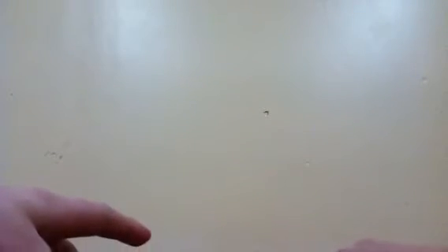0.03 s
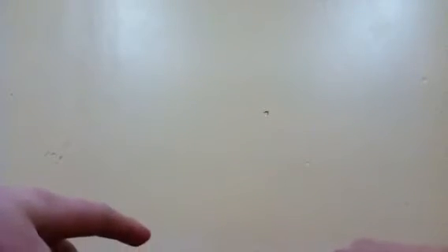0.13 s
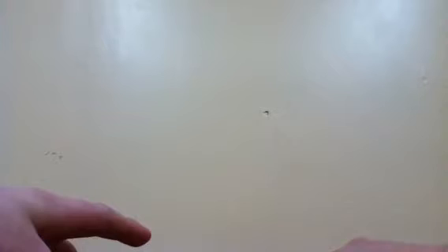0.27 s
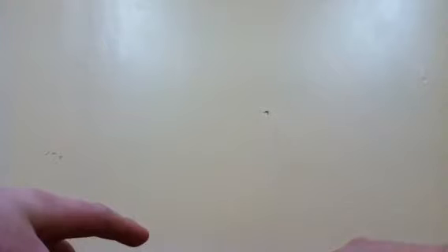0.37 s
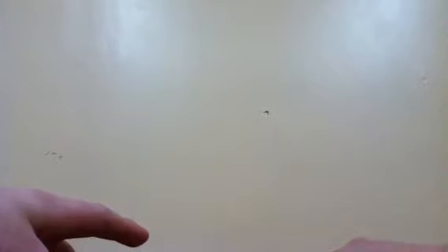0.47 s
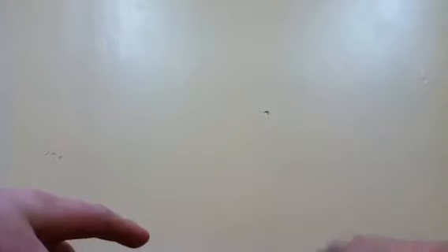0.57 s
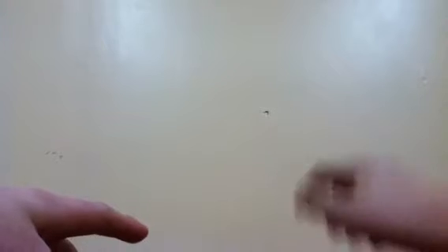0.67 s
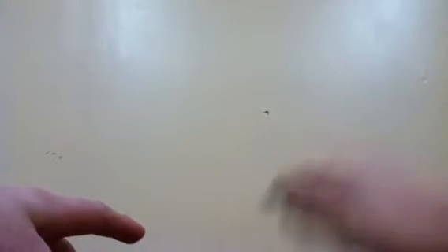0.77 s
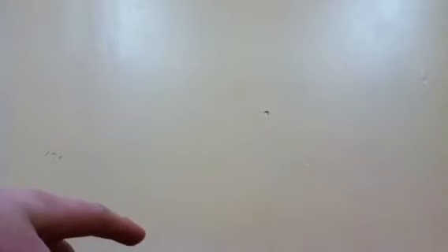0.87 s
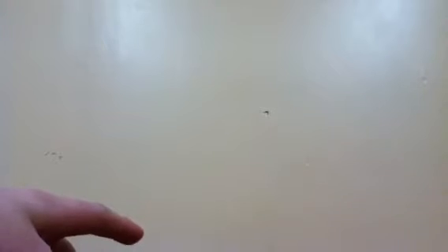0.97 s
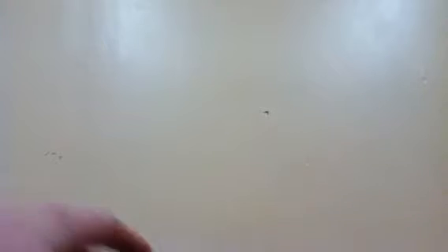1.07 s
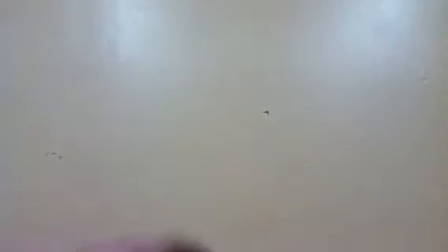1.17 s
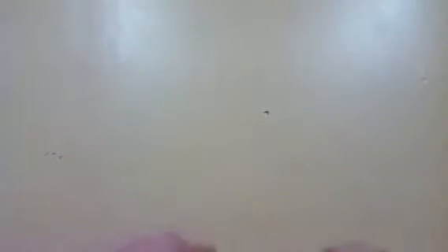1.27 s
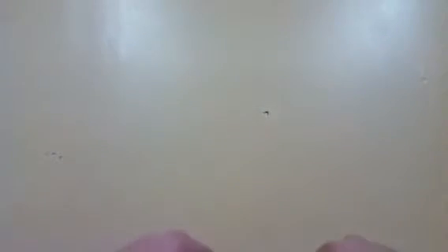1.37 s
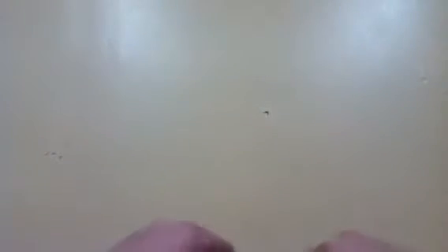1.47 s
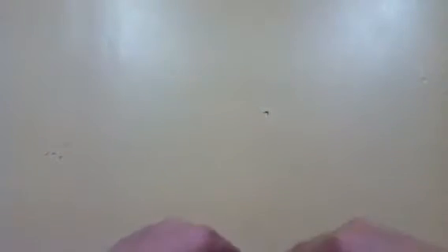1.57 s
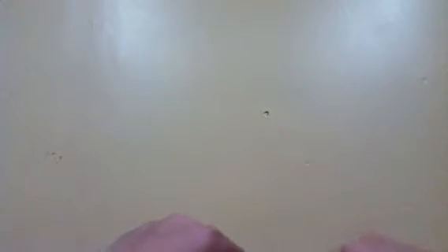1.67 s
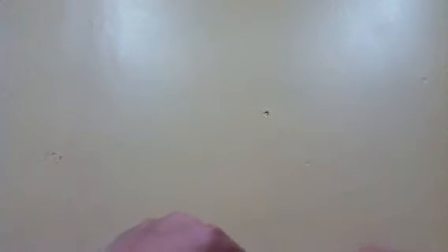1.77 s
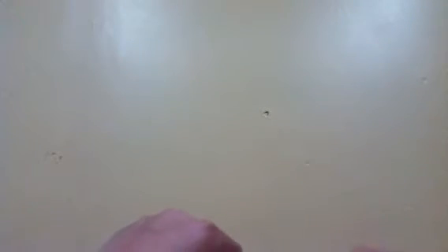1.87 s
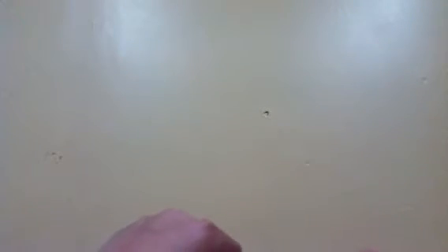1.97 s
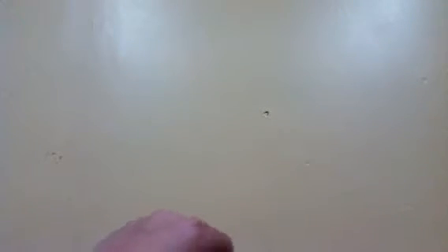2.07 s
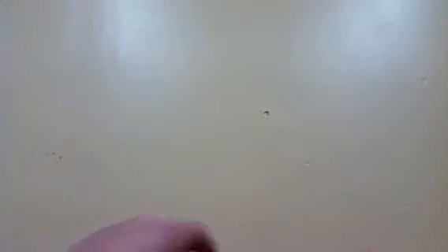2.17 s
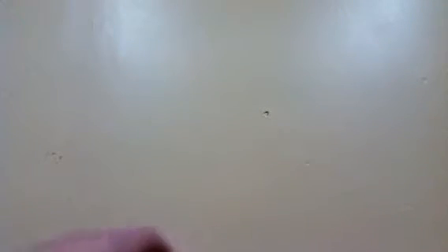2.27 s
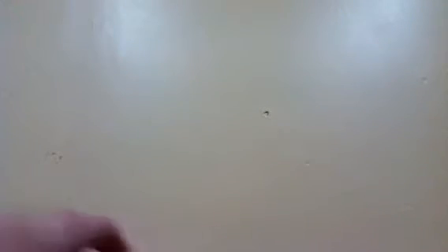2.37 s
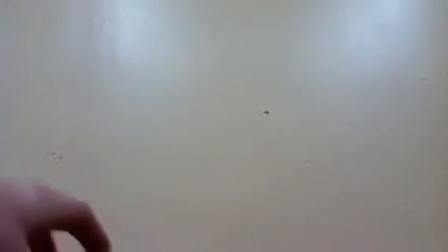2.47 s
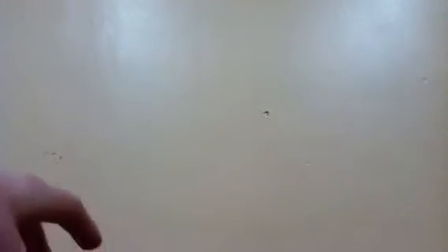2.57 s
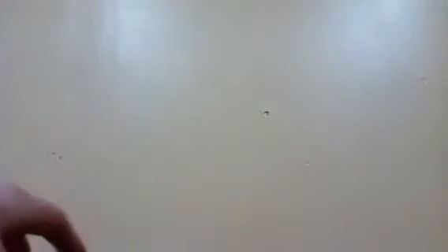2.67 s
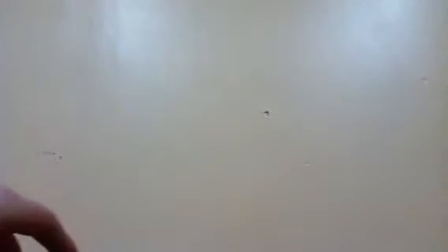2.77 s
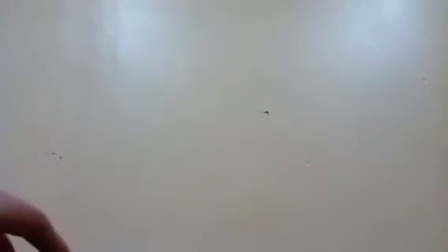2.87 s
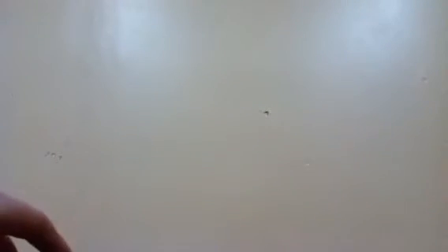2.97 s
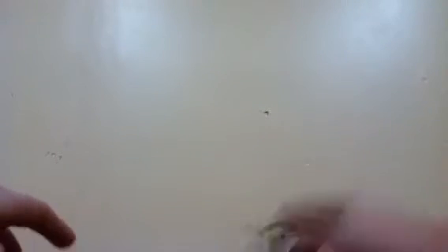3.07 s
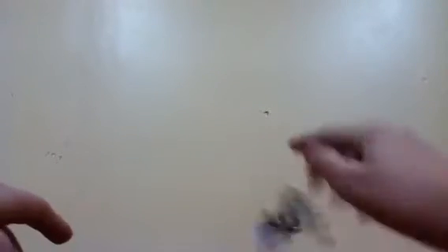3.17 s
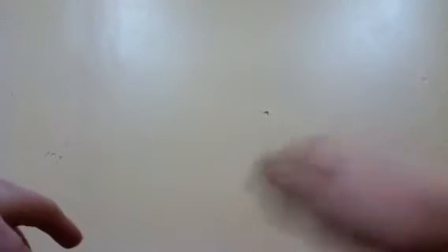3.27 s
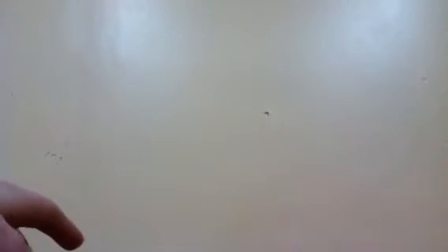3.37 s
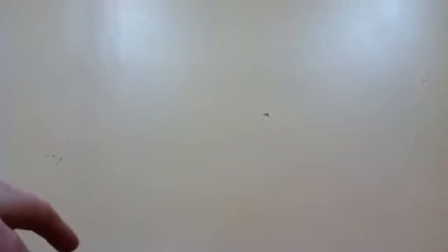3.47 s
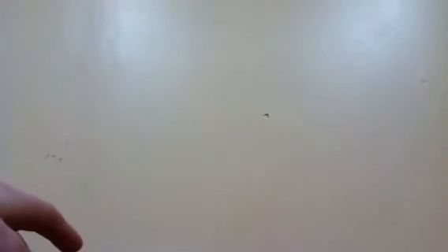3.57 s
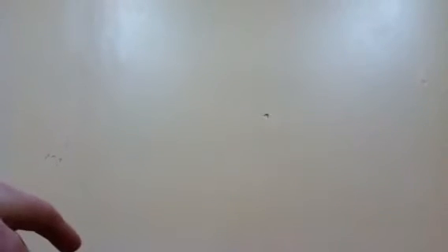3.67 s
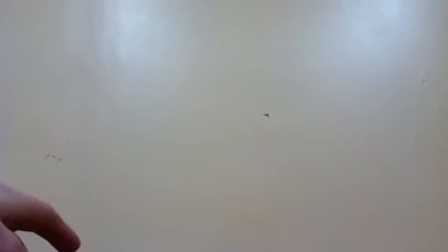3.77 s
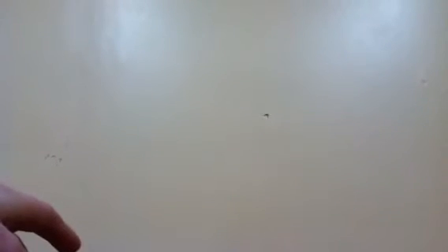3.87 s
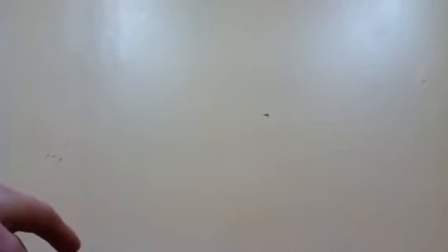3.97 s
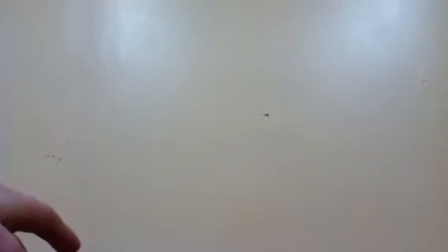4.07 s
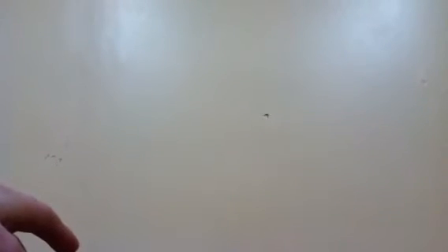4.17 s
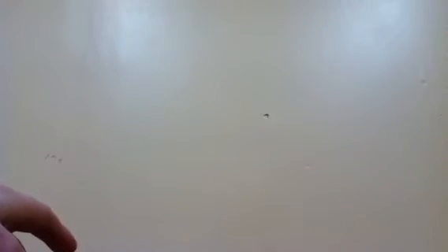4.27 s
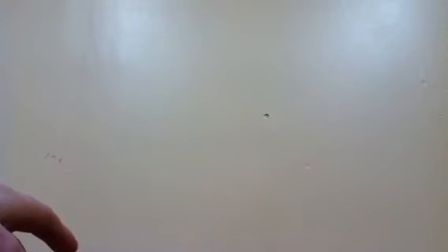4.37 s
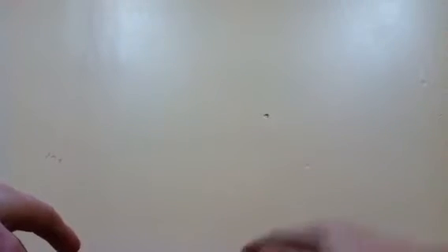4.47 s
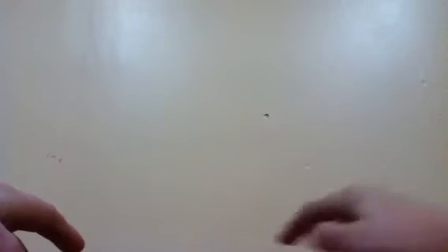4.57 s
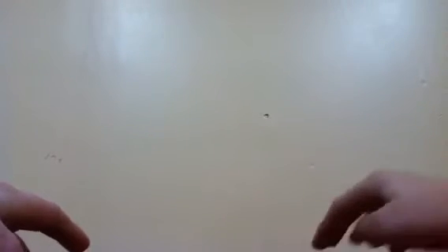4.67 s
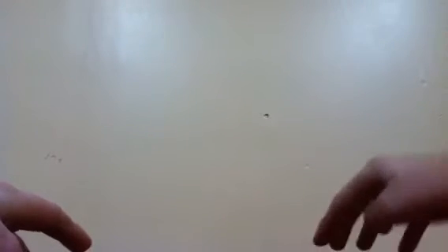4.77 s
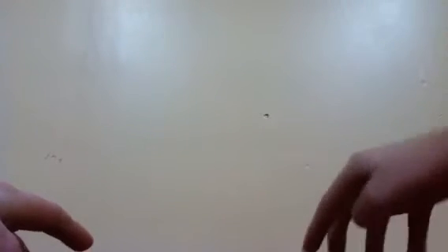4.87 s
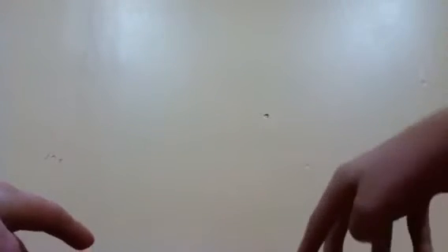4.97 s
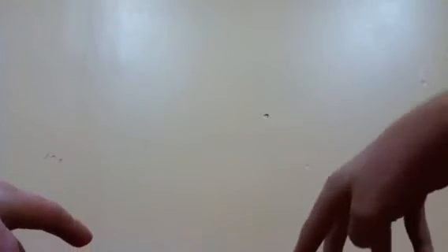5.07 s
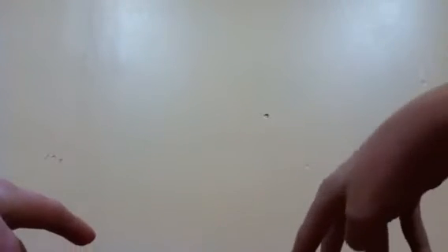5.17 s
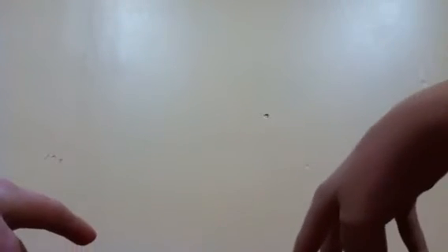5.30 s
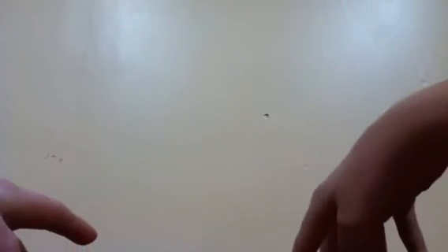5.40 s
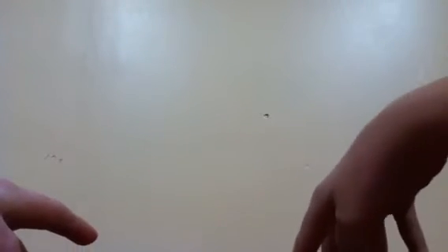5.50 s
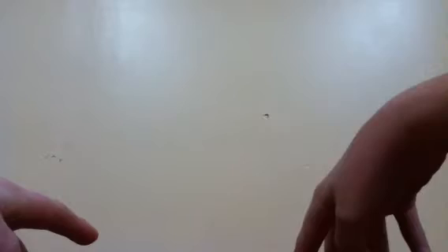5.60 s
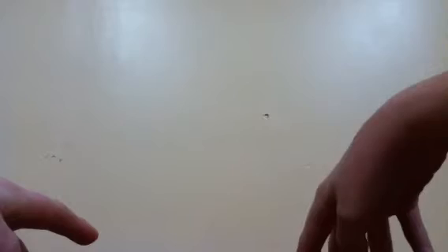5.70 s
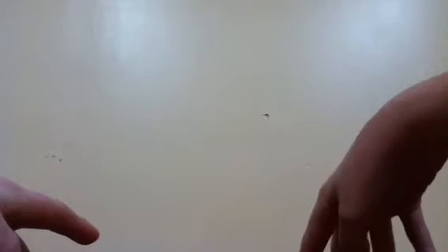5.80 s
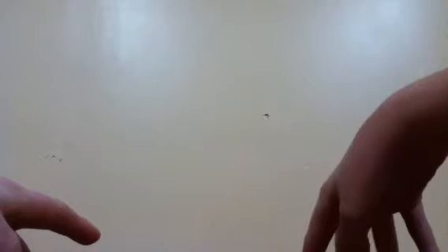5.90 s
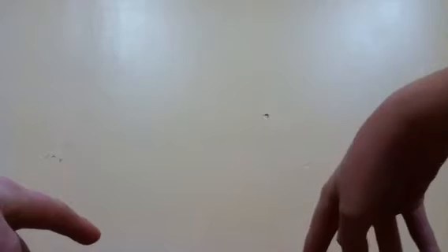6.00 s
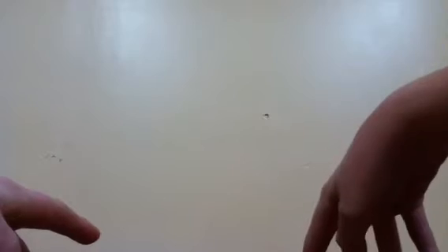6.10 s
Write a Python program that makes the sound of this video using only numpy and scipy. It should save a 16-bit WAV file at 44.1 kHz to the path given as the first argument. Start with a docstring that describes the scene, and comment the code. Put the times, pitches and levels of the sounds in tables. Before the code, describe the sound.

Small wooden deck clacks and rattles on a tabletop, two flip attempts with a hard double landing, then soft finger rubs over steady room hum.

```python
"""In a small room, a fingerboard is popped, flipped and landed on a wooden table.
Each clack sums damped modes of the deck, a noise rattle of trucks and wheels, and damped modes of the table.
Rolling, sliding, bright hiss and short low swells are streams of tiny bumps, shaped in level and spectrum.
Dull knocks and a low rumble are damped low table modes; echoes, a steady hum, hiss and a thin whine surround all.
A gain control turns the level down at loud contacts and lets it recover slowly."""
import sys
import numpy as np
from scipy import signal
from scipy.fft import rfft, irfft, next_fast_len
from scipy.io import wavfile
from scipy.ndimage import uniform_filter1d, minimum_filter1d

SR = 44100
rng = np.random.default_rng(int(sys.argv[2]) if len(sys.argv) > 2 else 0)


def file_out(sig):
    """Save sig as 16-bit WAV at sys.argv[1]."""
    # one column per channel
    cols = np.atleast_2d(sig).T
    # limit, then scale
    lim = np.clip(cols, -1, 1)
    pcm = np.round(lim * 32767).astype(np.int16)
    wavfile.write(sys.argv[1], SR, pcm)


N = 270774

# steady background, spectral density: (f/Hz, relative level/dB)
FLOOR = [(15, -40.5), (25, -14.5), (111, 0), (229, -0.5), (503, -9), (818, -12), (887, -13.5),
         (1520, -14.5), (1890, -17.5), (2350, -16.5), (4740, -18.5), (5280, -17), (6740, -19), (14800, -23),
         (16000, -26.5)]
FLOOR_DB = -58.5  # rms
WHINE_HZ, WHINE_DB = 14992, -80  # centre frequency, rms level
# reverberation of the room: (f/Hz, t60/s)
ROOM_T60 = [(100, 1), (400, 0.24), (900, 0.15), (1600, 0.3147), (2400, 0.24), (3400, 0.3), (7000, 0.23),
            (15000, 0.19)]
# spectrum of the echoes: (f/Hz, level/dB)
ROOM_DB = [(100, -1), (190, -6), (400, -0.5), (520, -6), (800, -2.5), (1400, -8.5), (3000, -13),
           (7000, -11), (15000, -10.5)]
# bright hiss, spectral density: (f/Hz, relative level/dB)
HISS = [(100, -15.5), (500, -11), (2000, -6), (4500, -5), (7000, -1), (10500, -1), (13000, -11),
        (16000, -15)]
# swells of bright hiss, some sliding, some at the landings: (peak t/s, length/s, level/dB, treble/dB)
HISS_SWELLS = [(0.731, 0.071, -39, -2.5), (1.305, 0.54, -50, -7), (1.626, 0.11, -36.5, -7.5),
               (2.30, 0.5, -49.5, -5), (3.168, 0.15, -43, -3), (3.386, 0.012, -22.5, -1.5),
               (4.502, 0.026, -36, -8)]
# colour shared by the hiss swells: (bass/dB, resonance f/Hz, its lift/dB)
HISS_TONE = (5.2, 9700, 2.9)
# friction of wheels or hand on the tabletop, also the low swells: (f/Hz, relative level/dB)
WHEELS = [(50, -20.5), (200, -7), (420, 0), (600, -3), (850, 3), (1200, -3.5), (1650, -6.5), (2100, -14.5),
          (3000, -15.5), (5000, -18), (15000, -26.5)]
# short low swells, the one at 3.59 s the room ringing on after the landing:
# (peak t/s, length/s, level/dB, resonance f/Hz)
LOW_SWELLS = [(0.699, .05, -35.5, 1660), (.705, 0.067, -30.5, 900), (1.399, 0.078, -32, 960),
              (1.915, 0.082, -49, 497), (2.055, 0.048, -47.5, 790), (3.59, 0.24, -41, 1853),
              (4.426, 0.054, -41, 830), (4.461, 0.14, -45, 920)]
# colour shared by the low swells: (bass/dB, treble/dB, lift of the resonance/dB)
LOW_TONE = (-6, -9.5, 6.9)
LOW_RISE_SHARE, HISS_RISE_SHARE = .36, .42  # part of a swell's length before its peak
# fingertips rubbing over the table: (t/s, relative level/dB)
RUB = [(5.39, -75), (5.426, -45.5), (5.486, -44.5), (5.546, -63), (5.578, -51), (5.652, -64), (5.688, -47),
       (5.708, -56), (5.72, -40), (5.748, -52), (5.866, -62.5), (5.902, -42.5), (6.038, -45.5),
       (6.082, -71), (6.088, -47.5), (6.13, -54)]
# colour of the rub: (bass/dB, treble/dB, resonance f/Hz, its lift/dB)
RUB_TONE = (-4, -10.5, 1141, 5)
# side of the hand dragging: (t/s, relative level/dB)
DRAG = [(5.92, -61), (5.93, -62), (5.968, -41.5), (6.07, -60)]
# colour of the drag: (bass/dB, treble/dB, resonance f/Hz, its lift/dB)
DRAG_TONE = (13, -5, 286, 6.5)
RUB_DB, DRAG_DB = -2.5, -7.5  # added to the curves
# squeak of a wheel: (peak t/s, length/s, level/dB, bass/dB, treble/dB, resonance f/Hz, its lift/dB)
SQUEAK = (3.132, .055, -41, -3, 3, 3216, 18)
# the board rolling to and fro, one curve a run: (t/s, relative level/dB)
ROLLS = [
    [(1.25, -39.5), (1.304, -57.5), (1.338, -47.5), (1.362, -49), (1.37, -57)],
    [(1.58, -41), (1.624, -55), (1.636, -41.5), (1.688, -52), (1.706, -62), (1.88, -58.5)],
    [(2.14, -58), (2.208, -71), (2.312, -55), (2.662, -60.5), (2.894, -51.5), (3.0, -69.5)],
]
# resonance of each run: (f/Hz)
ROLL_HZ = [1310, 434, 420]
# colour shared by the runs: (bass/dB, treble/dB, lift of the resonance/dB)
ROLL_TONE = (-2, -2, 11)
ROLL_DB = -3.5  # added to the curves
# dull knocks, and a low rumble at 1.315 s: (t/s, level/dB, pitch f/Hz)
THUMPS = [(0.707, -32.5, 139), (0.969, -24, 134), (.972, -32, 300), (1.237, -37.5, 78), (1.246, -36.5, 285),
          (1.315, -48, 76), (1.404, -19, 585), (1.43, -27, 420), (1.55, -33, 410), (1.902, -37.5, 590),
          (2.049, -39, 800), (3.14, -34, 135), (3.143, -29, 410), (3.389, -34, 132), (3.462, -29.5, 82),
          (3.467, -28, 420), (4.531, -24, 420), (5.717, -35, 810)]
# low modes of the whole table flexing: (f/Hz, relative level/dB, t60/s)
FLEX = [(78, -0.5, 0.3), (136, 0, .12), (288.4, 0, 0.25), (417.4, 0.5, .125), (598, 0, .13), (822, 0, .085)]
# kinds of contact: (bass/dB, deck snap/dB, rattle t60/s, lift of the resonance/dB); t60 is held above zero
TAIL = (3.5, -9, 0.01, 8)
EDGE = (3.5, -9, 0.0562, 13)
FLAT = (-5.5, -0.5, 0.02, 4)
STOMP = (8.5, -7, .02, 9)
TRUCK = (1, -3, 0.0926, 6)
AXLE = (-3, -10, 0.04, 14)
FINGER = (-8, -3, -0.05, 20)
# one row a clack: (t/s, force level/dB, treble/dB, resonance of the part struck f/Hz, kind of contact)
CLACKS = [(.7055, -17, 3.5, 2220, TAIL), (0.709, -23, 4, 5660, AXLE), (0.7157, -27.5, 11, 6030, TAIL),
          (.792, -16, 3, 2960, FLAT), (.841, -27.5, -3.5, 5470, TRUCK), (.8452, -28.5, 3, 6350, EDGE),
          (0.8874, -25, -3.5, 1160, TRUCK), (.909, -26, -1.5, 8340, AXLE), (.934, -30.5, -5, 8500, AXLE),
          (0.9482, -22.5, -8, 8100, TRUCK), (.968, -19, -9, 2820, FLAT), (0.9721, -20.5, -14, 1360, TRUCK),
          (1.035, -45.5, -4, 8300, AXLE), (1.0768, -45.5, -6, 8240, AXLE), (1.235, -37, -17, 1760, TRUCK),
          (1.2449, -38, 7.5, 1480, EDGE), (1.395, -38, 3.5, 8000, AXLE), (1.4012, -34.5, 16, 935, TAIL),
          (1.4051, -26, 9, 900, TAIL), (1.4155, -34, 13, 10300, TAIL), (1.4179, -22, 3, 8400, STOMP),
          (1.5463, -25.5, 4.5, 3000, STOMP), (1.616, -48, 4, 6960, EDGE), (1.7742, -49.5, -6, 2410, EDGE),
          (1.872, -50.5, 0, 3900, EDGE), (2.132, -51.5, -4, 3050, EDGE), (2.7522, -47.5, -2, 4100, EDGE),
          (3.107, -44, -5, 3360, EDGE), (3.139, -14, 6.5, 6460, TAIL), (3.159, -33, -4, 3100, EDGE),
          (3.181, -29, 2.5, 6760, AXLE), (3.2505, -50, 6, 9490, TAIL), (3.3842, -8.5, 3, 3010, EDGE),
          (3.395, -1.5, -16, 2340, FLAT), (3.438, -27.5, 3, 7250, FLAT), (3.4516, -13, -5.5, 2370, FLAT),
          (3.463, -6.5, -7.5, 2700, FLAT), (3.465, -2, -4, 1620, FLAT), (3.4707, -5, -16.5, 1660, FLAT),
          (4.4275, -39.5, -17.5, 1600, FLAT), (4.438, -45.5, 2.5, 4150, EDGE),
          (4.4447, -37, -22, 890, FINGER), (4.5034, -11, -14.5, 2992, FLAT),
          (4.5215, -19, -6.5, 2570, FLAT), (4.5351, -27, -6.5, 1010, FINGER),
          (4.5435, -30, -16, 890, FINGER), (4.8349, -50.5, -1, 4040, AXLE),
          (5.398, -57.5, 10.5, 9150, AXLE), (5.428, -45.5, -9, 1200, FINGER), (5.4857, -54, 2, 2700, FLAT),
          (5.717, -44, -33, 1560, FINGER), (5.883, -47.5, -5, 1530, FINGER),
          (5.9178, -37.5, -13, 1190, FINGER), (6.088, -52, -16, 940, FINGER), (6.0948, -55, 8, 8800, AXLE)]
# modes of the small deck: (f/Hz, relative level/dB, t60/s)
DECK = [(1730, -9.5, 0.0032), (2760, -1, 0.003), (3900, -1.5, 0.00098), (6700, -6, 0.0023),
        (9190, -12.5, 0.0014)]
# modes of the tabletop before detuning: (nominal f/Hz, relative level/dB, nominal t60/s)
TABLE = [(250, -18, .25), (273.2, -3, 0.45), (336.4, 0.5, 0.17), (410.5, 3.5, 0.19), (446.6, -0.5, 0.32),
         (588.5, -2.5, .18), (716, -4.5, 0.23), (824, -6.5, .15), (924, 2, .19), (1071, -2, .21),
         (1148, -5.5, 0.36), (1234, -11.5, 0.24), (1485, -14.5, 0.14), (1555, -2.5, 0.1), (1670, -7, 0.28),
         (1970, -5, 0.23), (2240, -8.5, 0.28), (2700, -7, 0.11), (3160, -5, 0.08)]
# loose trucks and wheels, spectral density: (f/Hz, relative level/dB)
RATTLE = [(40, -37), (200, -8), (400, -6), (520, -13), (800, 3), (1600, 1.5), (2900, -5), (3800, -4),
          (4800, -6), (6500, -5), (9500, -6), (12500, -15), (16000, -27)]
HARD_DB = -22  # harder clacks rebound
# first mean gap in s, ratio of successive mean gaps, loss a hop in dB, log-normal scatter of the gaps
HOP_S, HOP_SHRINK, HOP_LOSS_DB, HOP_SCATTER = .007, .84, 17, .15
EDGE_HZ, CEILING = 16300, .7  # upper band limit, peak amplitude ahead of it


def amp(db):
    """Level: converts decibels to an amplitude ratio."""
    return 10 ** (np.asarray(db) / 20)


def evened(x):
    """Normalisation: scales a signal to rms 1."""
    return x / np.sqrt(np.mean(x ** 2) + 1e-20)


def read(points, hz):
    """Interpolation: joins (f/Hz, value) points on a log-frequency axis."""
    f, value = np.transpose(points)
    return np.interp(np.log(hz + 1), np.log(f + 1), value)


def add(mix, s, sound):
    """Superposition: adds a sound to the mix from time s."""
    part = mix[max(round(s * SR), 0):][:len(sound)]
    part += sound[:len(part)]


def colour(x, spectrum):
    """Linear filtering: gives a noise the spectrum, at rms 1."""
    gain = amp(read(spectrum, np.fft.rfftfreq(len(x), 1 / SR)))
    return evened(irfft(rfft(x) * gain, len(x)))


def tone(x, bass_db, treble_db, peak_hz, peak_db, bass_hz=550, treble_hz=4300, octaves=.13, tilt=.12):
    """Causal filtering: shapes bass (heavy contact), treble (hard contact) and one resonance."""
    size = next_fast_len(len(x) + 2048)
    hz = abs(np.fft.fftfreq(size, 1 / SR)) + 1
    bass = 1 / (1 + (hz / bass_hz) ** 4)
    treble = 1 / (1 + (treble_hz / hz) ** 4)
    treble = treble * (hz / treble_hz / 2) ** tilt  # hardness tells most at the very top
    resonance = 1 / (1 + (np.log2(hz / peak_hz) / octaves) ** 2)
    db = bass_db * bass + treble_db * treble + peak_db * resonance
    # the Hilbert transform of the log gain gives the minimum phase
    gain = np.exp(np.conj(signal.hilbert(np.log(amp(db)))))
    return np.fft.ifft(np.fft.fft(x, size) * gain).real[:len(x)]


def fade(t, t60):
    """Exponential damping: the level falls 60 dB in t60 seconds."""
    return np.exp(-np.log(1000) * t / np.maximum(t60, 1e-4))


def ring(modes, t):
    """Modal vibration: one damped sine a mode, as rows."""
    return np.array([amp(db) * fade(t, t60) * np.sin(2 * np.pi * hz * t) for hz, db, t60 in modes])


def high_pass(x, hz):
    """First-order filtering: a gentle bass cut."""
    return signal.sosfilt(signal.butter(1, hz, "high", fs=SR, output="sos"), x)


def background(waver_hz=12):
    """Stationary noise for hum and hiss, with a frequency-modulated sine as a thin electronic whine."""
    waver = evened(uniform_filter1d(rng.standard_normal(N), size=1000))
    phase = 2 * np.pi * np.cumsum(WHINE_HZ + waver_hz * waver) / SR
    whine = amp(WHINE_DB) * evened(np.sin(phase))
    return amp(FLOOR_DB) * colour(rng.standard_normal(N), FLOOR) + whine


def echoes(first=.0024, build=.0013):
    """Reverberation: sparse wall reflections, each band dying at its own speed (times in s)."""
    size = SR * 3 // 4
    taps = rng.choice([-1., 1.], size) * (rng.random(size) < 5000 / SR)  # about 5000 echoes a second
    hz, t, bands = signal.stft(taps, SR, nperseg=256)
    damped = bands * fade(t, read(ROOM_T60, hz)[:, None])
    tail = signal.istft(damped, SR, nperseg=256)[1][:size]
    tail = tail * (1 - np.exp(-np.maximum(np.arange(size) / SR - first, 0) / build))
    gain = amp(read(ROOM_DB, np.fft.rfftfreq(size, 1 / SR)))
    return irfft(rfft(tail / np.linalg.norm(tail)) * gain, size)


def room(x, count=4, turns_per_s=5):
    """Source position shapes reflection: cycling through echo patterns stands for the moving board."""
    turns = np.arange(N) / SR * turns_per_s
    shares = np.maximum(np.cos(2 * np.pi * (turns - np.arange(count)[:, None] / count)), 0)
    return sum(signal.fftconvolve(x * share, echoes())[:N] for share in shares)


def grains(spectrum, grain_db, bumps_per_s):
    """Random pulse process: one second of tiny bumps of uneven size, as in friction."""
    size = amp(grain_db * np.minimum(rng.exponential(1, SR), 4))
    bumps = rng.choice([-1., 1.], SR) * (rng.random(SR) < bumps_per_s / SR)
    return colour(size * bumps, spectrum)


def swells(rows, rise_share, spectrum, grain_db, bumps_per_s):
    """Amplitude envelope: grainy noise rises to a peak and dies away in each row."""
    t, out = np.arange(SR) / SR - .5, np.zeros(N)
    for s, length, db, *timbre in rows:
        rise, fall = length * rise_share, length * (1 - rise_share)
        distance = abs(np.where(t < 0, t / rise, t / fall))
        swell = amp(-20 * distance ** 1.37)  # 20 dB down after one rise or fall time
        noise = tone(grains(spectrum, grain_db, bumps_per_s), *timbre)
        add(out, s - .5, amp(db) * swell * noise)
    return out


def travel(curve, db, timbre, grain_db, bumps_per_s, release_s=.067):
    """Sustained friction on the tabletop: follows a level curve and dies away beyond its ends."""
    (times, level), out = np.transpose(curve), np.zeros(N)
    start = times[0] - .05
    t = start + np.arange(SR) / SR
    beyond = abs(t - np.clip(t, times[0], times[-1]))
    swell = amp(db + np.interp(t, times, level)) * fade(beyond, release_s)
    add(out, start, swell * tone(grains(WHEELS, grain_db, bumps_per_s), *timbre))
    return out


def hiss_swells():
    """Dense random pulses: swells of bright hiss, some sliding, some at the landings."""
    bass_db, hz, lift_db = HISS_TONE
    rows = [(s, length, db, bass_db, treble_db, hz, lift_db) for s, length, db, treble_db in HISS_SWELLS]
    return swells(rows, HISS_RISE_SHARE, HISS, grain_db=6, bumps_per_s=27000)


def low_swells():
    """Sparse random pulses through a resonance: short low swells."""
    bass_db, treble_db, lift_db = LOW_TONE
    rows = [(s, length, db, bass_db, treble_db, hz, lift_db) for s, length, db, hz in LOW_SWELLS]
    return swells(rows, LOW_RISE_SHARE, WHEELS, grain_db=2, bumps_per_s=2500)


def hand():
    """Sliding friction: fingertips rub over the table, then the side of the hand drags."""
    rubbing = travel(RUB, RUB_DB, RUB_TONE, grain_db=4, bumps_per_s=1300)
    dragging = travel(DRAG, DRAG_DB, DRAG_TONE, grain_db=2.5, bumps_per_s=2500)
    return rubbing + dragging


def wheels():
    """Rolling friction: one resonant squeak, and longer, quiet runs."""
    out = swells([SQUEAK], LOW_RISE_SHARE, WHEELS, grain_db=2, bumps_per_s=2500)
    bass_db, treble_db, lift_db = ROLL_TONE
    for run, hz in zip(ROLLS, ROLL_HZ):
        timbre = bass_db, treble_db, hz, lift_db
        out = out + travel(run, ROLL_DB, timbre, grain_db=2.5, bumps_per_s=1600)
    return out


def thumps(rise_s=.0061, db_per_octave=30):
    """Soft excitation: a slow onset, with mainly the low table modes near the given pitch answering."""
    t, out = np.arange(SR // 2) / SR, np.zeros(N)
    modes, onset = ring(FLEX, t), 1 - np.exp(-t / rise_s)
    for s, db, hz in THUMPS:
        octaves_off = abs(np.log2(np.array(FLEX)[:, 0] / hz))
        share = amp(db - db_per_octave * octaves_off)
        add(out, s, share @ modes * onset)
    return out


def contacts(count=2):
    """Inelastic rebound: hard clacks hop, each hop weaker and on average sooner than the last."""
    for s, db, treble_db, hz, (bass_db, snap_db, t60, lift_db) in CLACKS:
        timbre = bass_db, treble_db, snap_db, t60, hz, lift_db
        yield (s, db, *timbre)
        for hop in range(count if db > HARD_DB else 0):
            s += HOP_S * HOP_SHRINK ** hop * np.exp(HOP_SCATTER * rng.standard_normal())
            db -= HOP_LOSS_DB
            yield (s, db, *timbre)


def deck_snap(t, small_hz=450, contact_hz=9500):
    """Hard impact: the deck modes ring briefly, rounded by the give of the wood."""
    deck = high_pass(ring(DECK, t).sum(0), small_hz)  # the deck is too small to radiate bass
    return signal.sosfilt(signal.butter(2, contact_hz, fs=SR, output="sos"), deck)


def truck_rattle(t, t60, shake_s=.0004):
    """Loose-part chatter: damped noise that starts just after the snap."""
    shake = fade(t, t60) * (1 - np.exp(-t / shake_s))
    noise = colour(rng.choice([-1., 1.], len(t)), RATTLE)
    return evened(noise * shake) * np.std(shake)


def table_ring(t, table_hz=170, spot_db=5, detune=.017):
    """Modal excitation: the spot struck sets the sign and strength of each table mode."""
    # the hand leaning on the table detunes its modes a little from blow to blow
    modes = high_pass(ring(TABLE, t * (1 + detune * rng.standard_normal())), table_hz)
    spot = rng.choice([-1., 1.], len(TABLE)) * amp(spot_db * rng.standard_normal(len(TABLE)))
    return spot @ modes


def clacks(deck_db=10, rattle_db=-.5, table_db=-22):
    """Impact: each contact snaps the deck, shakes the trucks and rings the tabletop: (board, table)."""
    t, board, table = np.arange(SR // 2) / SR, np.zeros(N), np.zeros(N)
    deck = deck_snap(t)
    for s, db, bass_db, treble_db, snap_db, t60, part_hz, part_db in contacts():
        crack = amp(deck_db + snap_db) * deck + amp(rattle_db) * truck_rattle(t, t60)
        add(board, s, amp(db) * tone(crack, bass_db, treble_db, part_hz, part_db))
        ringing = tone(table_ring(t), bass_db, treble_db, part_hz, 0)
        add(table, s, amp(db + table_db) * ringing)
    return board, table


def scene():
    """Superposition: board, hand and swells with echoes, the table, the thumps and the background."""
    board, table = clacks()
    near = board + wheels() + hand() + low_swells() + hiss_swells()
    sound = high_pass(near + room(near) + table, hz=68.9)  # a small microphone hears little deep bass
    return (sound + thumps() + background())[None]


def record(dry, threshold_db=-14, recovery_db_per_s=8):
    """Dynamic compression: gain drops at once and recovers slowly; a peak limiter and band limit follow."""
    power_db = 10 * np.log10(abs(uniform_filter1d(dry[0] ** 2, size=160)) + 1e-12)
    recovery = np.arange(N) / SR * recovery_db_per_s
    held_db = np.maximum.accumulate(power_db + recovery) - recovery
    over_db = np.maximum(held_db - threshold_db, 0)
    ducked = dry * amp(-uniform_filter1d(over_db, size=40))
    # the limiter turns each peak down smoothly over about half a millisecond
    headroom = minimum_filter1d(np.minimum(CEILING / (abs(ducked[0]) + 1e-9), 1), size=25)
    limited = ducked * uniform_filter1d(headroom, size=25)
    low_pass = signal.firwin(255, EDGE_HZ, window=("kaiser", 9), fs=SR)
    return signal.oaconvolve(limited, low_pass[None], "same")


dry = scene()
out = record(dry)
file_out(out)
```